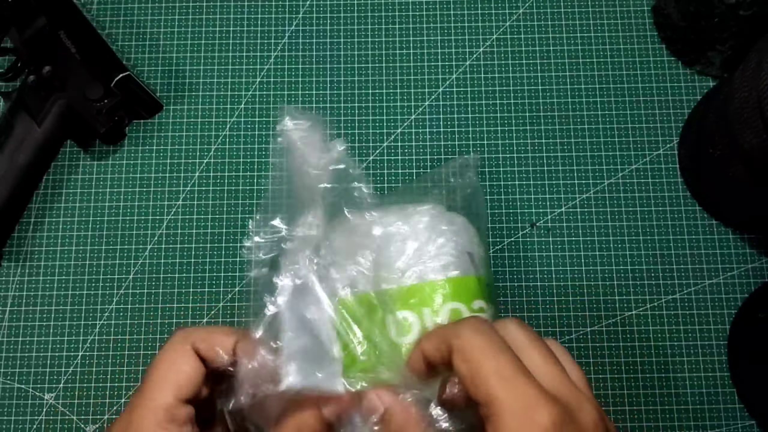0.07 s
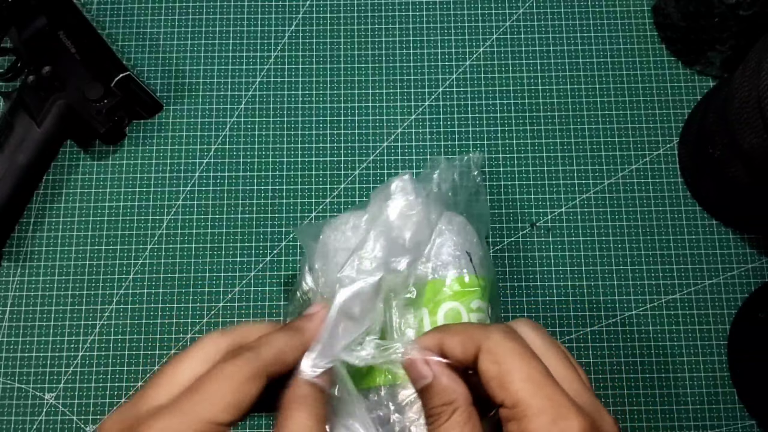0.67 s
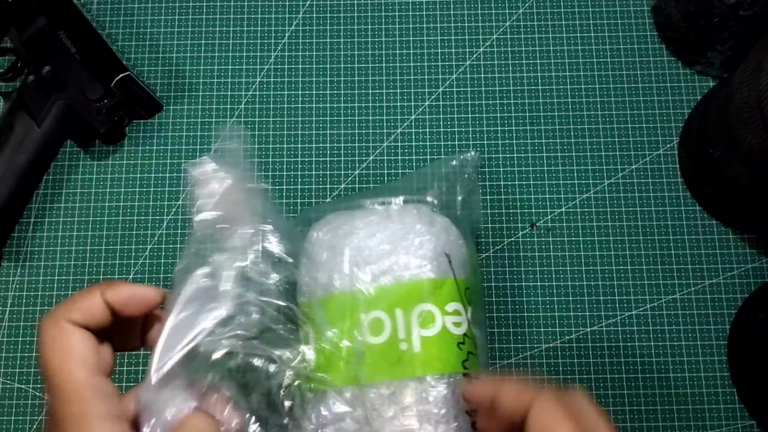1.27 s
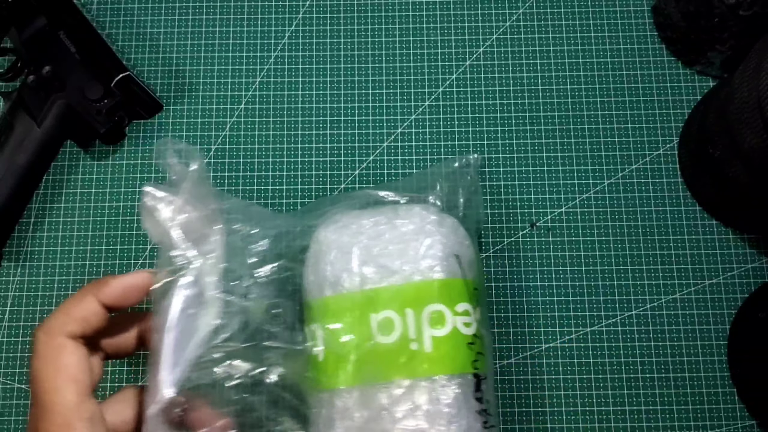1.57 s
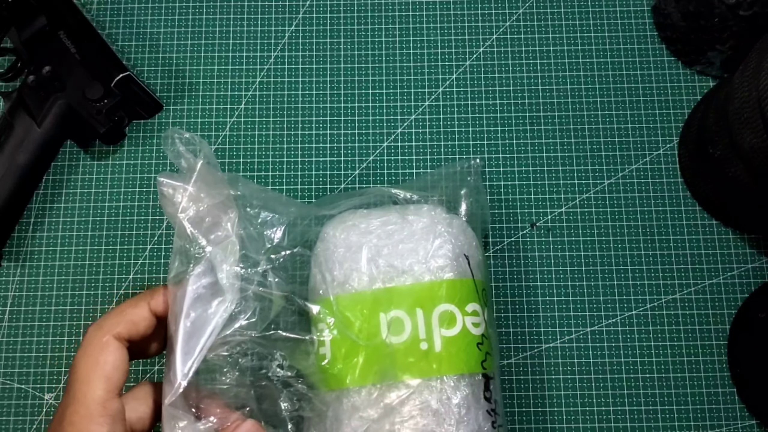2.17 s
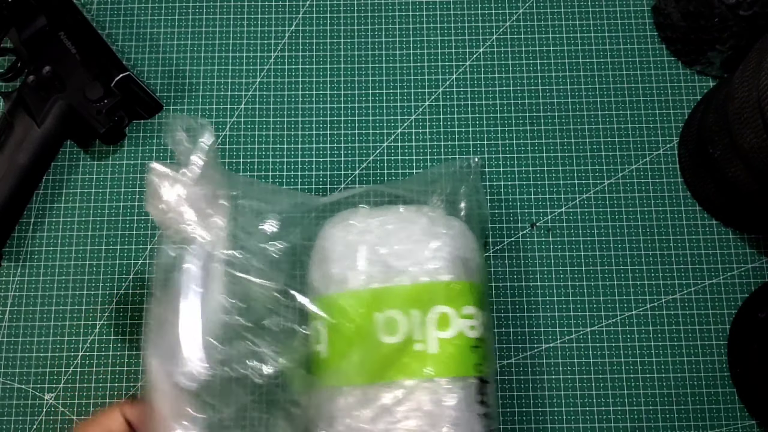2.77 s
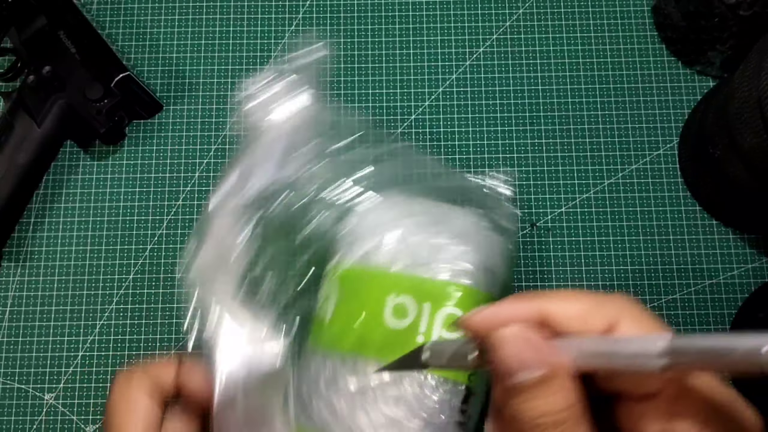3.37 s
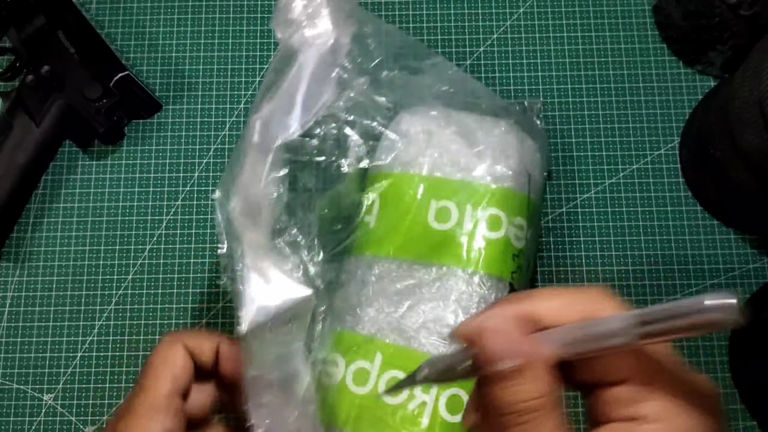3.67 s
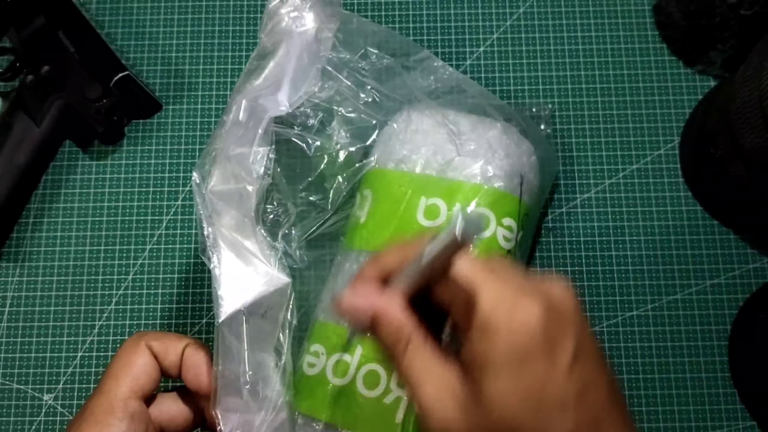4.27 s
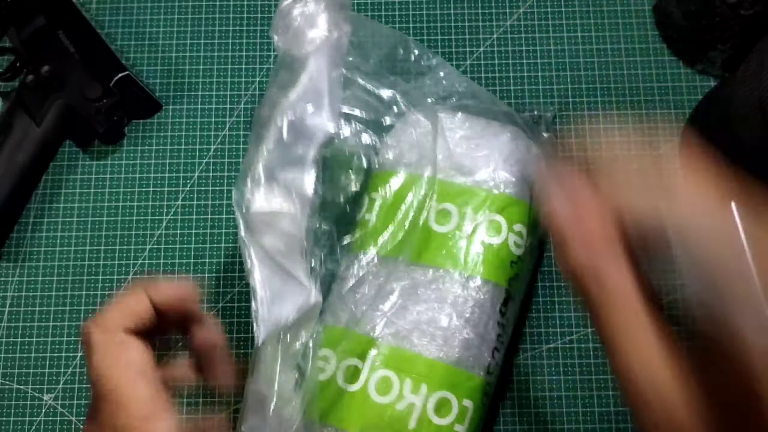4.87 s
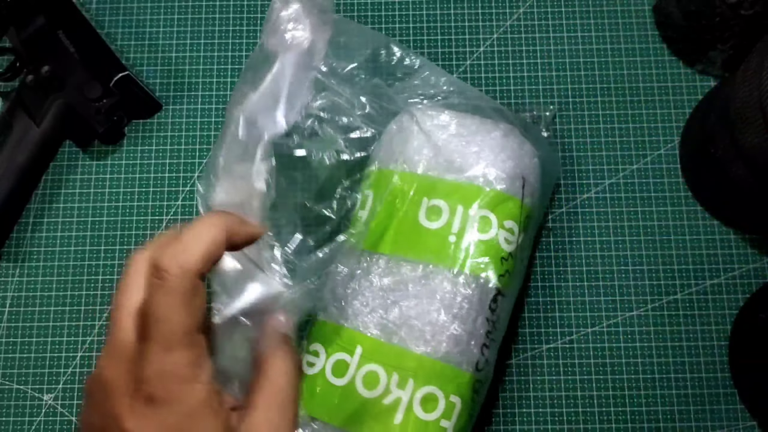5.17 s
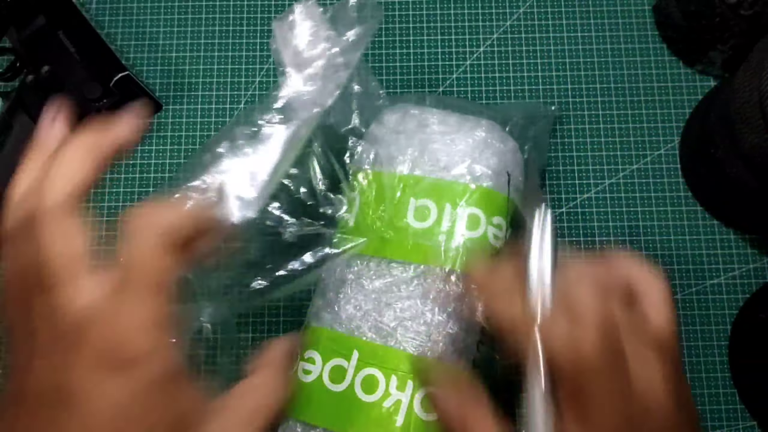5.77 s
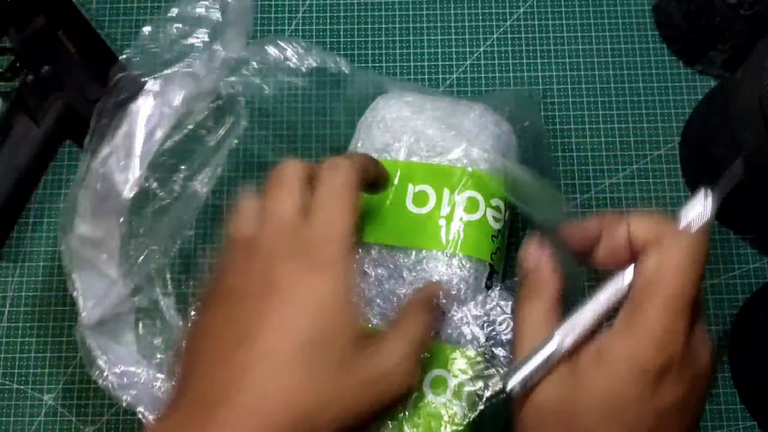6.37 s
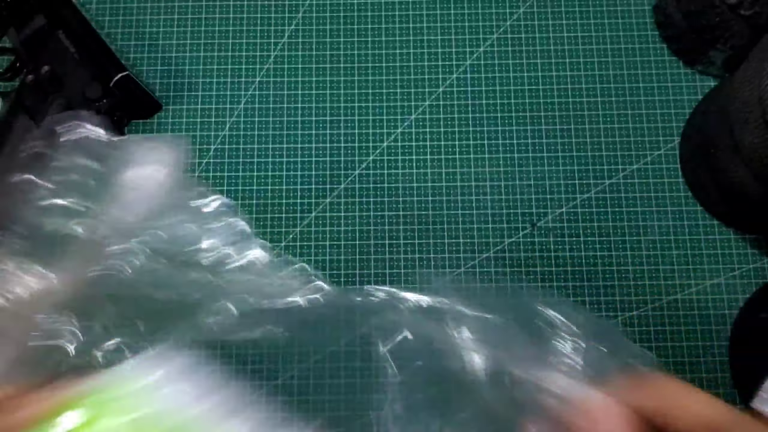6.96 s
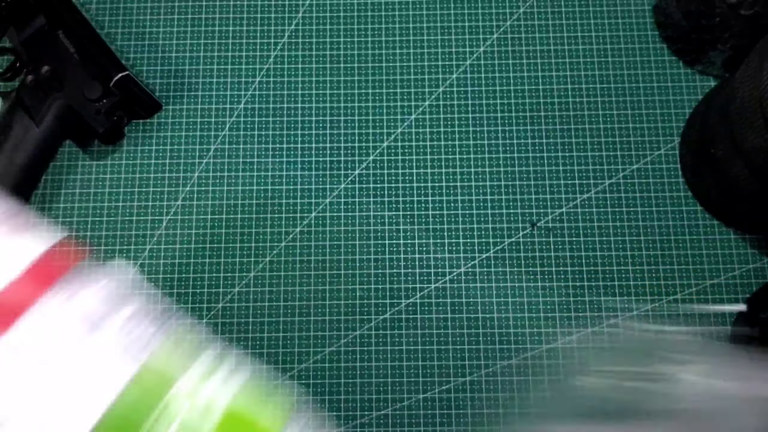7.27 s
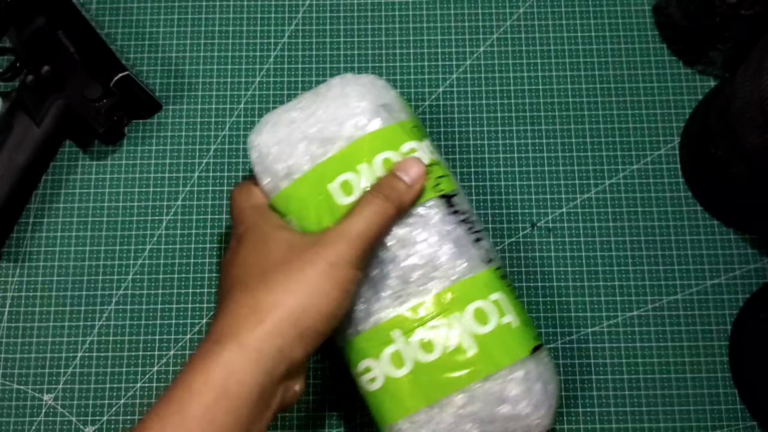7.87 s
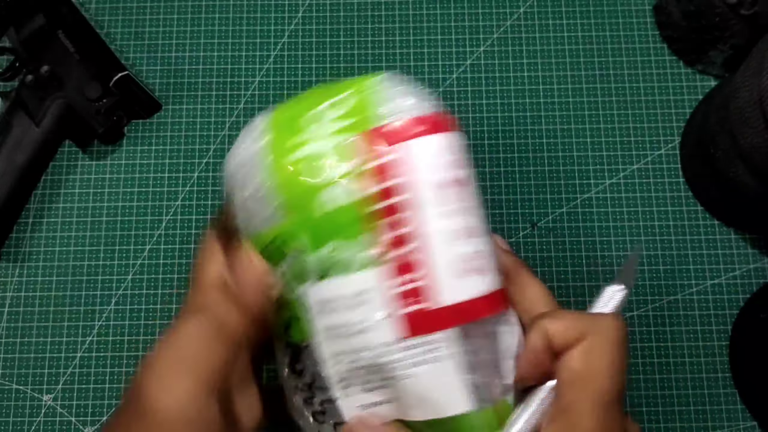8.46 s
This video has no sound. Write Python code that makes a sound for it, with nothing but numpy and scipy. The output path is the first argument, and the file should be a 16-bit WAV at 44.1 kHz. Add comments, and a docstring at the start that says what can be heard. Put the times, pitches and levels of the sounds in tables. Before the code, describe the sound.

Close by in a small room, hands crinkle a thin plastic bag in quick, jerky bursts with sharp little snaps. In a lull, a small metal knife rattles lightly as it is picked up. The rustling returns, and the blade slits the bag with short swishes and hollow taps. Louder crackling follows as the bag is pulled off, then palms rub softly over the bubble-wrapped parcel.

```python
"""Unwrapping a parcel

Close by in a small room, hands pull a thin plastic bag off a bubble-wrapped parcel on a cutting mat.
Buckling wrinkles crackle, creases snap, and taps knock the hollow parcel. A metal craft knife rings
in its bending modes as it is picked up, then slits the bag with a swish of friction. At last the palms
slide over the bare wrapping. Faint low hums and room noise lie underneath."""
import sys
import numpy as np
from scipy import signal
from scipy.fft import rfft, irfft
from scipy.io import wavfile
from scipy.ndimage import uniform_filter1d

SR = 44100
rng = np.random.default_rng(int(sys.argv[2]) if len(sys.argv) > 2 else 0)


def waveform_to_disk(signal):
    """Save audio, clipped to [-1, 1], as 16-bit WAV at the path in sys.argv[1]."""
    frames = np.transpose(np.atleast_2d(signal))
    scaled = np.clip(frames, -1, 1) * 32767
    samples = np.round(scaled).astype(np.int16)
    wavfile.write(sys.argv[1], SR, samples)


N = 383669
TIME = np.arange(N) / SR


def rustle(gains, usual_db=-48, wrinkles_per_s=2000, bare_from_s=7.8, palm_share=0.34, jerk_db=0.72):
    """Buckling and sliding friction: harder handling flips more wrinkles and adds more smooth hiss."""
    # spectrum of the film: (frequency [Hz], relative density [dB])
    film_spectrum = [(150, -12), (240, -2), (295, -15.5), (350, -2), (420, -3.5), (540, 0), (760, -0.5),
                     (1000, -6.5), (1300, -6), (2100, -5), (4200, -6), (8700, -2.5), (12500, -10),
                     (14800, -5.5), (16000, -9.5)]
    # bands of fine wrinkles, broad folds and hollow body: (lower edge [Hz], upper edge [Hz])
    zone_edges = [(4300, 17000), (1150, 4700), (230, 1250)]
    effort_db = 20 * np.log10(gains[0]) - usual_db
    gliding_palms = palm_share * (TIME > bare_from_s)
    sliding = np.clip(0.35 + 0.018 * effort_db + gliding_palms, 0, 1)
    grains = buckles(wrinkles_per_s * from_db(0.6 * effort_db))
    film = np.sqrt(1 - sliding) * steady(grains) + np.sqrt(sliding) * rng.standard_normal(N)
    film = colour(film * from_db(jerk_db * drift(170)), film_spectrum)   # fingers move in jerks
    zones = [steady(band(film, *edges), window_s=0.064) for edges in zone_edges]
    return sum(gain * zone for gain, zone in zip(gains, zones))


def buckles(per_s, spread_db=4.0, clump_db=6.5, q=3.2, crack_share=0.17, facets=12):
    """Elastic buckling: wrinkles flip in clumps, each an impulse that rings one facet of the film."""
    flips = rng.random(N) < per_s * from_db(clump_db * drift(110)) / SR
    sizes = from_db(spread_db * np.minimum(rng.exponential(1, N), 4.5)) * rng.choice([-1, 1], N)
    facet, out = rng.integers(0, facets, N), 0
    for k, hz in enumerate(np.geomspace(600, 14000, facets)):
        clicks = flips * sizes * (facet == k) * from_db(2.0 * drift(13))   # the facets take turns
        crackle = resonate(clicks, hz, hz / q) + crack_share * clicks
        out = out + room(crackle, near_db=-4.5, tail_db=-1.0, t60=0.089)
    return out


def handling(sag_db_per_s=11, settle_db_per_s=153.5, creep_db=-13, creep_db_per_s=80):
    """Stress relaxation: pulled film sags, settles and creeps, giving gains for wrinkles, folds, body."""
    # grabs and pulls: (start [s], attack [s], hold [s], level [dB], weight on the parcel [dB])
    moves = [(-0.022, 0.006, 0.067, -47.5, -1.5), (0.091, 0.081, 0.0055, -41, 0),
             (0.197, 0.103, 0.053, -43.0, -2.0), (0.389, 0.028, 0.059, -47.0, 0),
             (0.469, 0.12, 0.17, -44.5, -1.5), (0.753, 0.085, 0.01, -43, -3.0),
             (0.854, 0.019, 0.061, -48, 0.0), (0.958, 0.081, 0.084, -49.5, 0.5),
             (1.146, 0.017, 0.11, -46, -0.5), (1.285, 0.14, 0.104, -48.0, 0.5),
             (1.59, 0.019, 0.046, -51.5, 0.5), (1.678, 0.032, 0.21, -61.5, 4.5),
             (2.056, 0.008, 0.046, -66.5, -4.5), (2.178, 0.018, 0.084, -69, -10.0),
             (2.294, 0.027, 0.15, -69.5, 3), (2.443, 0.067, 0.13, -68, 1.5),
             (2.618, 0.05, 0.021, -44.5, -0.5), (2.711, 0.08, 0.097, -49.5, -1),
             (2.935, 0.058, 0.175, -56.5, 7), (2.984, 0.007, 0.15, -49, -3.5),
             (3.212, 0.019, 0.005, -51.5, -2), (3.322, 0.05, 0.151, -47, -2), (3.453, 0.15, 0.035, -45, 2),
             (3.689, 0.031, 0.013, -51.5, -1), (3.777, 0.012, 0.064, -48, -0.5),
             (3.98, 0.11, 0.175, -64.5, 2), (4.257, 0.086, 0.076, -57.5, 8),
             (4.414, 0.026, 0.005, -50, 7.0), (4.489, 0.018, 0.03, -49.0, 9.5),
             (4.559, 0.036, 0.047, -48, 4), (4.684, 0.018, 0.14, -56.5, 6),
             (4.893, 0.012, 0.0067, -54.0, -6), (5.03, 0.035, 0.03, -67, -1),
             (5.082, 0.081, 0.013, -49.5, 0), (5.187, 0.015, 0.13, -53.0, 0), (5.347, 0.029, 0.099, -58, 0),
             (5.456, 0.18, 0.012, -40, -2.5), (5.74, 0.033, 0.044, -47.5, -0.5),
             (5.86, 0.009, 0.005, -49.5, 1.5), (5.905, 0.17, 0.1, -42.5, -2.5),
             (6.172, 0.016, 0.029, -36, -3), (6.281, 0.023, 0.119, -49.5, -1.0),
             (6.358, 0.37, 0.142, -53, -4), (6.471, 0.028, 0.29, -57.5, 2.0),
             (6.722, 0.14, 0.01, -45.5, -0.5), (6.886, 0.035, 0.05, -40.5, -1.5),
             (7.006, 0.064, 0.038, -44.5, -1), (7.187, 0.0092, 0.11, -55, 1.5),
             (7.288, 0.06, 0.079, -50.5, -0.5), (7.501, 0.027, 0.082, -63.5, 1),
             (7.611, 0.026, 0.054, -57.5, 1.5), (7.836, 0.003, 0.0056, -53.5, -7),
             (7.868, 0.044, 0.008, -54.5, 1.5), (7.944, 0.012, 0.0044, -47.5, -2.5),
             (8.01, 0.013, 0.0034, -42, -4), (8.086, 0.06, 0.085, -59, 1.0),
             (8.23, 0.016, 0.16, -67.0, 1.5), (8.433, 0.0075, 0.17, -56.0, 2.5),
             (8.648, 0.03, 0.03, -59, 4.5)]
    power, t = np.zeros((3, N)) + 1e-10, TIME[:SR]
    for start, attack_s, hold_s, db, weight_db in moves:
        tighten = np.minimum(t / max(attack_s, 1 / SR), 1)
        sag = from_db(-sag_db_per_s * np.maximum(t - attack_s, 0))
        let_go_s = np.maximum(t - attack_s - hold_s, 0)
        settle = from_db(-settle_db_per_s * let_go_s)
        creep = from_db(creep_db - creep_db_per_s * let_go_s)
        burst = from_db(db) * tighten * sag * np.maximum(settle, creep)
        wrinkles_db, folds_db, body_db = 0.63, -3 + 0.52 * weight_db, -10.5 + weight_db
        for zone, zone_db in zip(power, (wrinkles_db, folds_db, body_db)):
            add(zone, start, (burst * from_db(zone_db)) ** 2)
    return np.sqrt(power)


def snaps_and_taps(usual_crack_db=-36, flutter_s=0.0034, wall_db=-27, t60=0.18, build_s=0.011, q=0.88):
    """Impulse excitation: a crease snapping through, or a tap, cracks and knocks the hollow parcel."""
    # creases giving way: (time [s], crack level [dB], pitch [Hz])
    snaps = [(0.1845, -34.5, 6700), (0.2994, -38, 6100), (0.346, -31.5, 6400), (0.541, -35, 8300),
             (0.8242, -29.5, 5770), (0.999, -40, 8170), (1.1579, -39.5, 5970), (1.5028, -41, 8100),
             (1.5278, -40.5, 6500), (1.8716, -50, 5200), (2.1016, -55, 7900), (2.191, -55.5, 7900),
             (2.231, -56.5, 8550), (2.258, -58, 8000), (2.5274, -52.5, 9800), (2.5829, -55.5, 7800),
             (2.989, -52, 5400), (3.5054, -38, 7400), (4.0238, -57.5, 3900), (4.093, -52, 6600),
             (4.122, -52, 7500), (4.129, -56, 8000), (4.185, -59, 6000), (4.22, -47.5, 6500),
             (4.287, -48, 5000), (4.309, -50, 6500), (4.3503, -49, 4730), (5.1466, -39, 6100),
             (5.2978, -41.5, 9100), (5.491, -41.5, 8900), (6.089, -32.5, 8700), (6.1815, -26, 9500),
             (6.418, -43, 7520), (6.6412, -40, 6400), (6.6925, -42.5, 6350), (6.7763, -41.5, 5000),
             (6.865, -40, 7600), (7.1592, -37.5, 9820), (7.4143, -44, 5200), (7.5258, -52, 3300),
             (7.6058, -50, 6400), (7.749, -55, 6200), (8.1482, -47, 3730)]
    # fingers and blade on the parcel: (time [s], crack level [dB], pitch [Hz], relative knock [dB])
    taps = [(1.0617, -38.5, 6300, -46.5), (2.4574, -71, 4120, -57), (4.0624, -56.5, 4870, -55.5),
            (4.4, -49, 4500, -50), (4.461, -52, 4100, -44.5), (4.5052, -38, 3800, -40),
            (4.511, -33, 5500, -46), (4.5236, -36.5, 5600, -51), (4.6202, -52, 4300, -40),
            (4.7975, -31, 7400, -39.5), (8.5279, -44, 1580, -37.5)]
    out, t = np.zeros(N), TIME[:SR // 4]
    walls = from_db(wall_db - 60 * t / t60) * np.minimum(t / build_s, 1) ** 2
    # a crease's knock grows faster than its crack
    creases = [(s, db, hz, usual_crack_db - 18 + 1.33 * (db - usual_crack_db)) for s, db, hz in snaps]
    for s, crack_db, hz, knock_db in creases + taps:
        noise = rng.standard_normal(len(t))
        flutter = 0.22 * np.exp(-t / flutter_s)   # smaller cracks follow the first
        push = (t == 0) + noise * (flutter + walls)
        crack = unit_attack(band(resonate(push, hz, hz / q) + 0.17 * push, 540, 15300, order=1))
        blow = (t == 0) + 0.5 * noise * walls
        knock = unit_attack(hollow(blow) + 0.24 * band(blow, 250, 1500, order=1))
        knock = band(knock, 110, hz / 5, order=1)   # a soft contact knocks duller
        add(out, s, from_db(crack_db) * crack + from_db(knock_db - 1) * knock)
    return out


def hollow(x):
    """Modal superposition: parcel and table answer a blow with a few broad resonances."""
    # modes of parcel and table: (frequency [Hz], bandwidth [Hz], gain [dB])
    modes = [(324, 73, -6.5), (468, 140, 4), (680, 66, 3.5), (756, 54, 8.5), (1350, 1700, -8)]
    return sum(from_db(db) * (-1) ** k * resonate(x, hz, width) for k, (hz, width, db) in enumerate(modes))


def knife(gripped_s=2.44, tick_s=0.0024, damp_s=0.004, lag_s=0.00085, wobble_db=2.8, buzz_db=-27):
    """Damped free vibration: each touch stops the metal's ring and starts another, until it is gripped."""
    # rattle on the mat, in relative levels:
    # (time [s], tick [dB], first bending mode [dB], second bending mode [dB], upper modes [dB])
    touches = [(2.2864, -21.5, -48.5, -34.5, -28.5), (2.3113, -28, -61, -38.5, -29),
               (2.323, -29, -40, -41, -44), (2.3546, -28.5, -42.5, -43, -44), (2.371, -28, -43, -43.5, -44),
               (2.3862, -30, -60, -48, -46), (2.393, -38, -52, -49, -37), (2.4013, -36, -47, -50, -46),
               (2.4114, -40, -45.5, -51, -45), (2.422, -36, -48.5, -56, -51)]
    # modes of the knife: (frequency [Hz], relative level [dB], 60 dB decay time [s])
    modes = [(3155, 0, .3), (6540, 0, .17), (6640, -7, .05), (10880, -21, .2), (12000, -20, .07),
             (12880, -14, .17), (14020, -7, .12), (14072, -9, .12), (15380, -18, .07)]
    out, t = np.zeros(N), TIME[:SR // 5]
    stops = [row[0] for row in touches[1:]] + [gripped_s]
    for (s, tick_db, first_db, second_db, upper_db), stop in zip(touches, stops):
        blade_buzz = unit_rms(band(rng.standard_normal(len(t)), 4800, 4900, order=1))
        ring = from_db(second_db + buzz_db) * blade_buzz
        for hz, db, t60 in modes:
            strength_db = first_db if hz < 4000 else second_db if hz < 8000 else upper_db
            rolling_db = wobble_db * drift(140, size=len(t))   # modes waver as the handle rolls
            envelope = from_db(strength_db + db + rolling_db - 60 * t / t60)
            ring = ring + envelope * np.sin(2 * np.pi * (hz * t + rng.random()))
        damping = np.exp(-np.maximum(t - (stop - s), 0) / damp_s)
        tick = band(rng.standard_normal(len(t)) * np.exp(-t / tick_s), 5400, 18600, order=2)
        tick = from_db(tick_db - 1) * tick / np.abs(tick).max()
        add(out, s + lag_s, from_db(0.8) * ring * damping + tick)
    radiated = band(out, 1100, 17000)   # so thin a rod radiates no bass
    return room(radiated, near_db=-32, tail_db=-7.0, t60=0.17)


def rubs(grit_db=4.0):
    """Stick-slip friction: blade and palms set the taut wrapping swishing with each stroke."""
    # strokes: (peak time [s], half length [s], level [dB], centre [Hz], bandwidth [Hz])
    strokes = [(4.455, 0.025, -53, 2120, 900), (4.633, 0.043, -48, 2150, 900),
               (4.637, 0.039, -47, 610, 320), (7.682, 0.035, -58, 2020, 1500),
               (7.842, 0.0027, -48.5, 6200, 8450), (7.962, 0.007, -48, 6000, 9000),
               (7.991, 0.095, -68, 358, 60), (8.027, 0.0081, -42, 5500, 9000),
               (8.146, 0.063, -53.5, 2000, 1300), (8.6, .04, -64, 2200, 1780)]
    out, t = np.zeros(N), TIME[:SR // 2]
    for s, half_s, db, hz, width in strokes:
        friction = rng.standard_normal(len(t)) * from_db(grit_db * drift(350.6, size=len(t)))
        swish = band(friction, max(hz - width / 2, 300), hz + width / 2, order=2)
        swell = np.exp(-((t - t.mean()) / half_s) ** 2)
        add(out, s - t.mean(), from_db(db) * swell * unit_rms(swish))
    return out


def room(x, near_db, tail_db, t60, near_s=0.0025, build_s=0.0076):
    """Reverberation: direct sound, a quick scatter off mat and hands, then the tail of the walls."""
    t = TIME[:SR // 3]
    near, tail = rng.standard_normal((2, len(t)))
    near *= np.exp(-t / near_s) * (t > 0)
    tail *= from_db(-60 * t / t60) * np.minimum(t / build_s, 1) ** 2
    response = from_db(near_db) * near / np.linalg.norm(near)
    response += from_db(tail_db) * tail / np.linalg.norm(tail)
    return x + signal.oaconvolve(x, response)[:len(x)]


def hums(waver=0.0117):
    """Amplitude and frequency modulation: faint low tones swell and fade, wavering in pitch."""
    # swells of hum: (peak time [s], half length [s], level [dB], frequency [Hz])
    swells = [(1.65, 0.19, -76, 237), (4.97, 0.089, -72.5, 237), (7.702, .2, -83, 240),
              (8.05, 0.49, -79.5, 92.2), (8.293, 0.28, -76.5, 231.3)]
    out = np.zeros(N)
    for s, half_s, db, hz in swells:
        phase = 2 * np.pi * np.cumsum(hz * (1 + waver * drift(25))) / SR
        out += from_db(db) * np.exp(-((TIME - s) / half_s) ** 2) * np.sin(phase)
    return np.sqrt(2) * out


def rumble(body_gain, room_db=-77, table_db=-17.5):
    """Incoherent addition: the noise of the still room and of the handled table sum in power."""
    # spectrum of the still room: (frequency [Hz], relative density [dB])
    room_spectrum = [(25, -16.5), (70, -16.5), (90, -8.5), (115, -0.5), (170, -5.5), (250, -1.5),
                     (400, -11.5), (900, -34.5), (3000, -26), (16000, -43)]
    gain = np.hypot(from_db(room_db), from_db(table_db) * body_gain)
    return gain * unit_rms(colour(rng.standard_normal(N), room_spectrum))


def from_db(db):
    """Decibels to amplitude ratio."""
    return 10 ** (np.asarray(db) / 20)


def unit_rms(x):
    """Normalisation to unit power."""
    return x / np.sqrt(np.mean(x ** 2) + 1e-20)


def unit_attack(x):
    """Normalisation to unit power over the first three milliseconds."""
    return x / np.sqrt(np.mean(x[:132] ** 2))


def steady(x, window_s=0.037):
    """Running normalisation to unit power; single grains keep their contrast."""
    return x / np.sqrt(np.abs(uniform_filter1d(x * x, int(window_s * SR))) + 1e-12)


def add(track, s, sound):
    """Superposition of a sound on a track from time s on."""
    at = max(round(s * SR), 0)
    track[at:at + len(sound)] += sound[:max(N - at, 0)]


def band(x, low_hz, high_hz, order=3):
    """Causal band-pass filtering."""
    sections = signal.butter(order, [low_hz, min(high_hz, .45 * SR)], "band", fs=SR, output="sos")
    return signal.sosfilt(sections, x + 1e-18)


def resonate(x, hz, width_hz):
    """Second-order resonance with unit gain at its peak."""
    hz = min(hz, .42 * SR)
    return signal.lfilter(*signal.iirpeak(hz, hz / min(width_hz, .35 * SR), fs=SR), x + 1e-18)


def colour(x, spectrum, size=8192):
    """Minimum-phase filtering along a given spectrum."""
    hz, db = np.transpose(spectrum)
    grid = np.maximum(np.fft.rfftfreq(size, 1 / SR), 1)
    cepstrum = irfft(np.log(from_db(np.interp(np.log(grid), np.log(hz), db))))
    cepstrum[1:size // 2] *= 2
    cepstrum[size // 2 + 1:] = 0
    return signal.oaconvolve(x, irfft(np.exp(rfft(cepstrum))))[:len(x)]


def drift(per_s, size=N):
    """Random modulation with a spread of about 1."""
    knots = rng.standard_normal(size // 20)
    return np.interp(TIME[:size] * per_s, np.arange(len(knots)), knots)


def scene():
    """Linear superposition of all sources at one point."""
    gains = handling()
    return (rustle(gains) + snaps_and_taps() + rubs() + knife() + hums() + rumble(gains[-1]))[None]


def record(dry, cutoff_hz=15800):
    """Band limiting: a steep low-pass removes the highest treble."""
    return signal.sosfilt(signal.ellip(10, .2, 80, cutoff_hz, fs=SR, output="sos"), dry)


dry = scene()
out = record(dry)
waveform_to_disk(out)
```